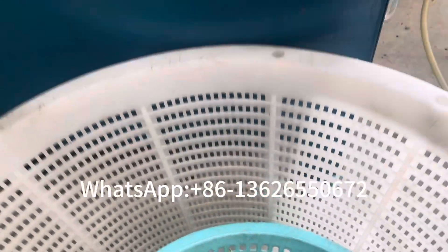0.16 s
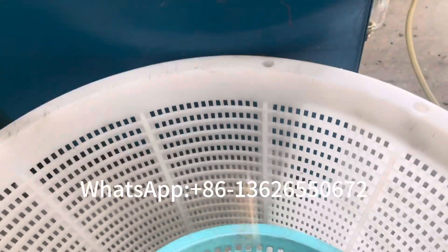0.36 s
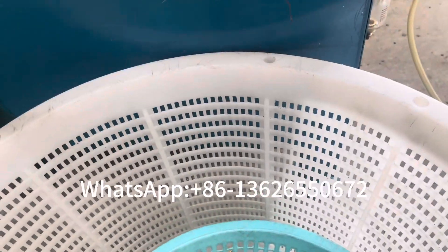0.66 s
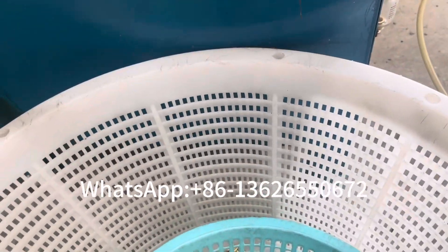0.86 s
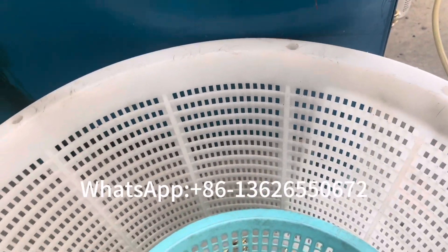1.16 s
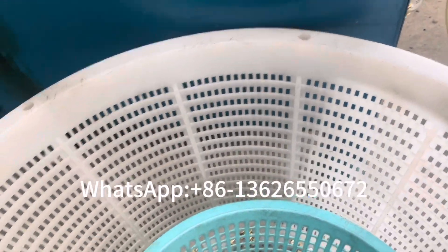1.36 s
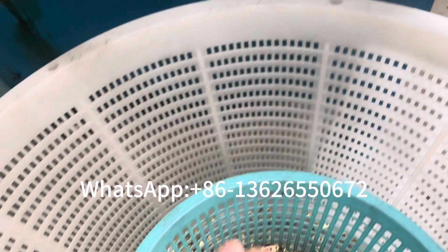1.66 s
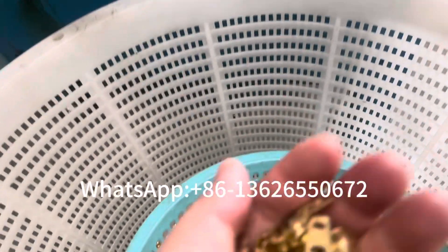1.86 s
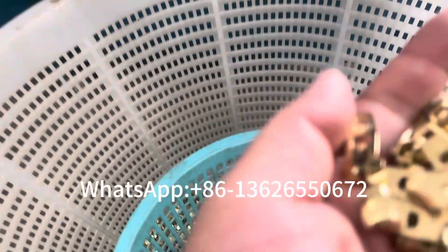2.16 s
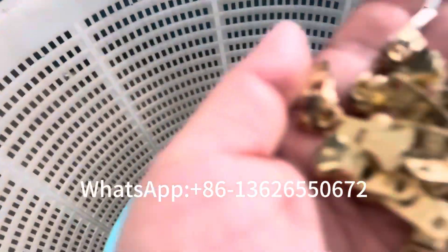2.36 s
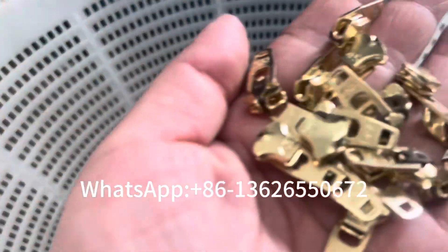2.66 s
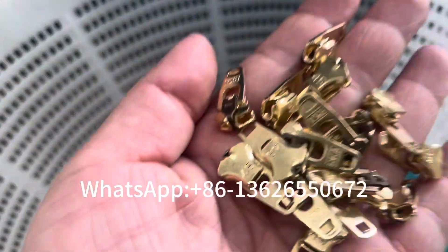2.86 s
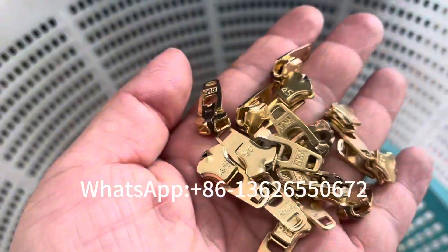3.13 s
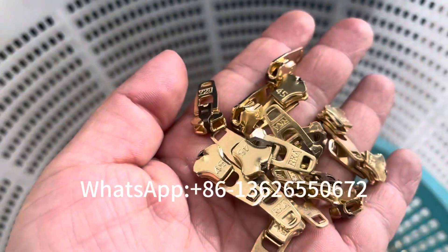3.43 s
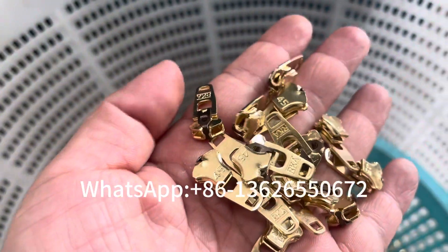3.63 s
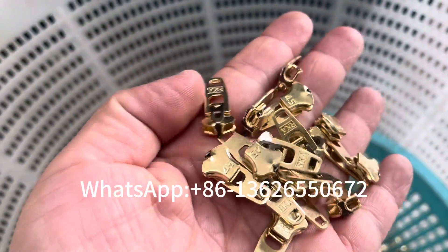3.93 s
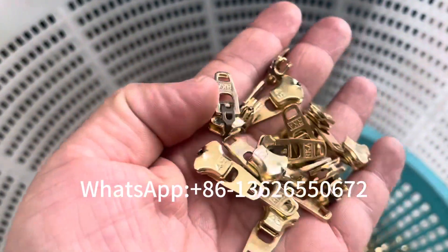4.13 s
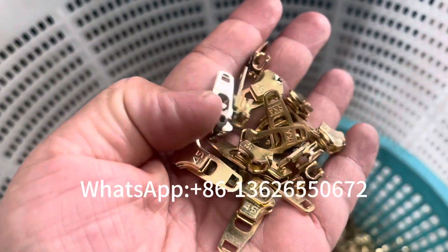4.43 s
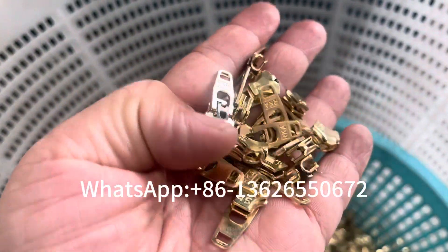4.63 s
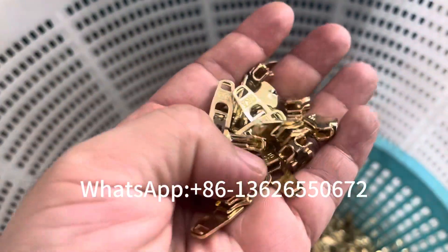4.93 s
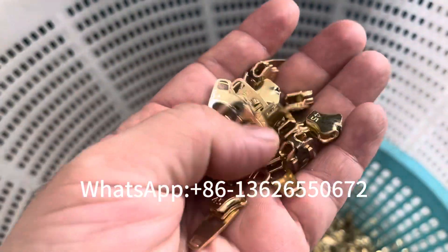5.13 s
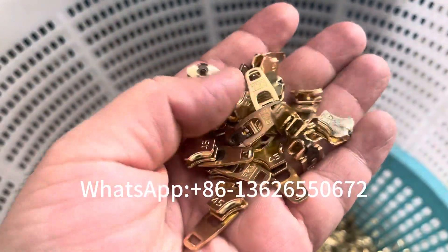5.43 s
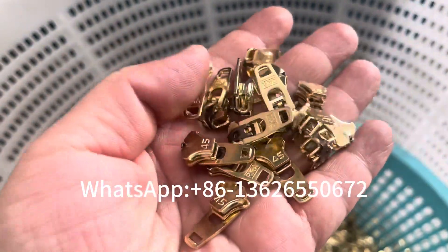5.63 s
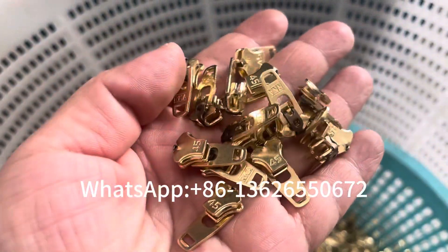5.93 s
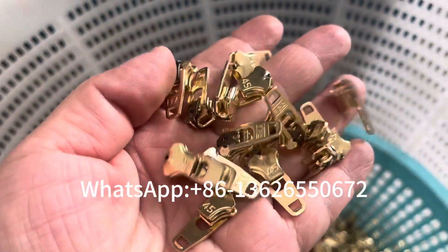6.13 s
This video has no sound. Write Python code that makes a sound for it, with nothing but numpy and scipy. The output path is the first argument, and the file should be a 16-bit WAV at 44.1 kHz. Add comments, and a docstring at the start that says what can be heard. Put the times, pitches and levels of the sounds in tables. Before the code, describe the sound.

A small assembly machine runs throughout, about 6.3 seconds, in a hard, reverberant workshop. From 0.13 s it strokes every 0.54 s: a deep knocking thump, then a lighter, slightly higher return thud 0.15 s later. Gritty rasps and short chatter follow each movement, with a crisp high tick about 0.22 s after each forward stroke. Small metal parts drop close by roughly once per cycle, with bright clinks, hard cracks and brief ringing, at 0.02, 0.58, 1.11 and 1.62 s, the last loudest with a brief dip in level after it, then on to 6.07 s. Latch snaps click late in some cycles. From about 3.7 s, sliders stirred in a hand add light ticks, strongest near 4.3 and 5.85 s. A vibrating bowl patters and rings continuously over low wavering hum and broadband workshop noise, heard in close stereo.

```python
"""Zip sliders beside a feeder and assembly machine

In a hard-walled workshop, a hand turns over brass sliders above a collecting basket, close to a stereo pair.
Swelling sines thump the frame out and back about twice a second; shaped grains rasp and noise bursts tick.
Finished parts drop with a clink of ringing modes and cracks; the vibrating bowl rings under random hops.
Behind lie wavering hum tones, banded noise for the workshop din, and a diffuse room tail."""
import sys
import numpy as np
from scipy import signal
from scipy.fft import rfft, irfft, next_fast_len
from scipy.io import wavfile

SR = 44100
rng = np.random.default_rng(int(sys.argv[2]) if len(sys.argv) > 2 else 0)


def file_out(sig):
    """Save sig as 16-bit WAV at sys.argv[1]."""
    # one column per channel
    cols = np.atleast_2d(sig).T
    # limit, then scale
    lim = np.clip(cols, -1, 1)
    pcm = np.round(lim * 32767).astype(np.int16)
    wavfile.write(sys.argv[1], SR, pcm)


N = 277389
TIME = np.arange(N) / SR
# the mechanism strokes forward once a cycle and returns after a fixed delay
FIRST_STROKE_S, CYCLE_S, RETURN_DELAY_S = 0.132, 0.5403, 0.152
STROKES_S = np.arange(FIRST_STROKE_S, N / SR, CYCLE_S)


def from_db(db):
    """Decibels to gain."""
    return 10 ** (np.asarray(db) / 20)


def rms_one(x):
    """Scale to unit power."""
    return x / np.sqrt(np.mean(x ** 2) + 1e-20)


def at_hz(points, hz):
    """Read a table on a log-frequency axis."""
    table_hz, values = np.array(points).T
    return np.interp(np.log(hz), np.log(table_hz), values)


def add(out, s, sound):
    """Mix a sound in at a time in seconds, trimmed to the scene."""
    i = int(round(s * SR))
    a, b = max(i, 0), min(i + sound.shape[-1], N)
    if b > a:
        out[..., a:b] += sound[..., a - i:b - i]


def drift(rate_hz):
    """Slow random wander with spread 1, drawn at every 40th sample."""
    r = np.exp(-80 * np.pi * rate_hz / SR)
    noise = rng.standard_normal(N // 40 + 2002)
    slow = signal.lfilter([1], [1, -2 * r, r * r], noise)[2000:]
    return np.interp(np.arange(N) / 40, np.arange(len(slow)), rms_one(slow))


def band(x, low_hz, high_hz):
    """Second-order band-pass."""
    edges = [low_hz, min(high_hz, .45 * SR)]
    return signal.sosfilt(signal.butter(2, edges, "band", fs=SR, output="sos"), x)


def ring(clicks, hz, t60):
    """A damped mode: a unit click starts a decaying sine of height 1."""
    r, w = from_db(-60 / (t60 * SR)), 2 * np.pi * hz / SR
    return signal.lfilter([0, np.sin(w)], [1, -2 * r * np.cos(w), r * r], clicks + 1e-18)


# how alike the left and right channels are: (f/Hz, likeness 0 to 1)
LIKENESS = [(50, 0.97), (250, 0.86), (500, 0.54), (700, 0.39), (2000, 0.42), (4000, 0.51), (6500, 0.52),
            (8000, 0.09), (12000, 1)]


def spread(pair, hz):
    """Two unrelated signals become left and right, as alike as the place makes them at this pitch."""
    alike = np.clip(at_hz(LIKENESS, hz), 0, .999)
    mid = np.sqrt((1 + alike) / 2) * pair[0]
    side = np.sqrt((1 - alike) / 2) * pair[1]
    return mid + side * np.array([[1], [-1]])


def grains(per_s, size_db):
    """Two trains of tiny collisions at random times, uneven in size and sign."""
    sizes = from_db(size_db * np.minimum(rng.exponential(1, (2, N)), 4))
    sizes *= rng.choice([-1, 1], (2, N))
    return rms_one(sizes * (rng.random((2, N)) < per_s / SR)) + 1e-18


def crack(low_hz, high_hz, t60):
    """A short stereo burst of contact noise, decaying from unit power."""
    t = TIME[:SR // 5]
    noise = rms_one(band(rng.standard_normal((2, len(t))), low_hz, high_hz))
    return spread(noise, np.sqrt(low_hz * high_hz)) * from_db(-60 * t / t60)


# frame modes, the low bending waves last: (f/Hz before stiffness, relative level/dB, delay t/s, swell t/s)
FRAME_THUMP_MODES = [(66.6, -15, 0.0014, 0.016), (102.5, 1, 0.00087, 0.0057), (163, -2.5, -.001, 0.006),
                     (207.4, -23, -.001, 0.0044)]
FRAME_KNOCK_MODES = [(297, -11.5, -.003, 0.0094), (379, 1.5, -.002, 0.0035), (630, -16.5, -.001, 0.0023)]
# the strokes grow very slowly lighter
STROKE_DRIFT_DB_PER_S = -0.06


def strokes(times, thump_db, knock_db, stiffness, scatter, vary_db):
    """Each stroke knocks the frame, and a deep thump follows a few milliseconds behind."""
    out, t = np.zeros(N), TIME[:SR // 8]
    for s in times:
        for modes, level in ((FRAME_THUMP_MODES, thump_db), (FRAME_KNOCK_MODES, knock_db)):
            level = level + STROKE_DRIFT_DB_PER_S * s + vary_db * rng.normal()
            for hz, mode_db, delay, swell in modes:
                pitch = hz * stiffness * np.exp(scatter * rng.normal())
                shape = t / swell * np.exp(1 - t / swell)
                add(out, s + delay, from_db(level + mode_db) * shape * np.sin(2 * np.pi * pitch * t))
    return out


# bursts from slides and jaws: (t/s from the forward stroke, swell t/s, centre f/Hz, width/octaves,
# relative level/dB)
RASP_BURSTS = [(-.012, 0.0082, 1980, 1.8, -28), (-.006, 0.0099, 330, 0.95, -29),
               (.03, .006, 1500, 1.2, -34.5), (.049, 0.0044, 2700, .4, -28), (.05, .012, 5540, 0.7, -32.5),
               (.055, 0.0065, 730, 0.26, -32), (0.063, 0.0056, 2020, .52, -26.5),
               (0.073, 0.0041, 1170, 1.06, -29), (.1505, 0.0033, 560, 0.36, -26),
               (0.166, 0.0015, 790, 0.21, -34), (.247, 0.0028, 1300, 1.1, -26),
               (0.253, 0.0028, 1900, 1.2, -23.5), (.262, 0.014, 384, 0.36, -32),
               (0.268, 0.0038, 940, .25, -26), (.269, 0.0046, 2200, 0.98, -30),
               (.279, 0.002, 1150, 0.51, -28.5)]


def rasps(level_db, vary_db, chatter_db, ring_db, per_s, size_db):
    """Slides and jaws chatter and rumble at the same points of every cycle, and set the bowl ringing."""
    out, size = 0, next_fast_len(N)
    hz = np.maximum(np.arange(size // 2 + 1) * SR / size, 1)
    body = 1
    for mode_hz, width_hz, _ in BOWL_MODES:
        body = body + from_db(ring_db) / (1 + 2j * (hz - mode_hz) / width_hz)
    for delay, swell_s, centre_hz, octaves, rasp_db in RASP_BURSTS:
        colour = body * np.exp(-.5 * (np.log2(hz / centre_hz) / octaves) ** 2)
        scrapes = grains(per_s, size_db) * from_db(chatter_db * drift(72))
        grit = rms_one(irfft(rfft(scrapes, size) * colour, size)[:, :N])
        force, age = np.zeros(N), TIME[:SR // 4] / swell_s
        for s, strong in zip(STROKES_S, rng.standard_normal(len(STROKES_S))):
            add(force, s + delay, from_db(rasp_db + vary_db * strong) * age * np.exp(1 - age))
        out = out + force * spread(grit, centre_hz)
    return from_db(level_db) * out


# modes of a small stop, tapped after each forward stroke: (f/Hz, relative level/dB, t60/s)
STOP_MODES = [(2776, 1, 0.056), (2700, -6, 0.041), (2270, -14, 0.066)]
TAP_DELAY_S = .2187


def taps(level_db, vary_db, crack_db, crack_t60):
    """A small stop is struck once in every cycle: a crisp tick and its short ring."""
    clicks, out = np.zeros((2, N)), np.zeros((2, N))
    for s in STROKES_S + TAP_DELAY_S:
        force = from_db(level_db + vary_db * rng.normal())
        add(clicks, s, force * spread((1, rng.normal()), STOP_MODES[0][0]))
        add(out, s, force * from_db(crack_db) * crack(2100, 4500, crack_t60))
    for hz, mode_db, t60 in STOP_MODES:
        out += from_db(mode_db) * ring(clicks, hz, t60)
    return out


def chatter(s, bounce_db, bounce_s):
    """A part touches down and bounces twice within milliseconds: (t/s, level/dB from the first touch)."""
    gaps = bounce_s * (.5 + rng.random(2))
    return [(s, 0), (s + gaps[0], bounce_db), (s + gaps.sum(), 2 * bounce_db)]


# about one part lands in each cycle, and some hop and land again:
# (t/s, then relative level/dB near each of the six frequencies below)
LANDINGS = [(0.024, -23.5, -35, -28, -22, -10.5, -22), (0.114, -42, -45, -45, -31, -34, -34),
            (0.5834, -26, -38, -43, -34, -20, -33), (0.613, -26, -36, -36, -30, -30, -33),
            (0.626, -23, -32, -34, -23, -20, -38), (1.1109, -16, -26, -37, -21.5, -15.5, -28),
            (1.172, -29, -48, -45, -33, -31, -41), (1.6157, -21, -21, -22, -9, -5.5, -19),
            (1.683, -18, -48, -44, -26, -32, -32), (1.761, -28, -30, -42, -23, -23, -35),
            (1.804, -36, -46, -48, -42, -22, -40), (2.2623, -15, -47, -45, -27, -17, -26),
            (2.291, -26, -45, -45, -34, -37, -40), (2.865, -20.5, -34, -29, -24, -14, -25),
            (3.257, -19.5, -35, -40, -27.5, -18, -30), (3.29, -21.5, -48, -46, -36, -39, -46),
            (3.3254, -22.5, -52, -52, -39, -35, -36), (3.914, -24.5, -42, -42, -29, -29, -39),
            (4.3572, -21.5, -35, -37, -24, -19, -30), (5.011, -23, -34, -39, -24.5, -22, -39),
            (5.4555, -19.5, -38, -32, -32, -19, -33), (5.651, -21.5, -45, -43, -36, -22, -35),
            (6.074, -15.5, -28.5, -25.5, -24, -12, -23)]
# the six frequencies of those levels: (f/Hz)
LANDING_BANDS_HZ = [3000, 5120, 5500, 7000, 8400, 11000]
# noise bands of a crack around those frequencies: (low f/Hz, high f/Hz)
CRACK_BANDS_HZ = [(2700, 3250), (3800, 5300), (5300, 6400), (6500, 7600), (7700, 9400), (9400, 14000)]
# the crack of a touch in each of those bands: (relative level/dB, t60/s)
CRACK_DECAYS = [(-6.5, .055), (-12, .04), (-14, .04), (-5, .1), (-4, .08), (-3, .071)]
# modes of the metal that the landing parts strike: (f/Hz, relative level/dB, t60/s)
METAL_MODES = [(2821, -5, .17), (2900, -8, .07), (3010, -6, .07), (3075, -8, .1), (3143, -6, .14),
               (3402, -15, .2), (3585, -11, .3), (3946, -11, .15), (4274, -7, .25), (4468, -11, .2),
               (4768, -7, .25), (5120, 0, .48), (5496, -2.5, .42), (5965, -9, .12), (6440, -12, .2),
               (6713, -11, .25), (6896, -2, .14), (6993, -5, .11), (7320, -7, .1), (7660, -6, .08),
               (8000, -3, .07), (8570, 0, .11), (9120, -5, .1), (9450, -8, .08), (9905, -9, .08),
               (10470, -9, .12), (11020, -7, .13), (11650, -10, .1)]


def clinks(ring_db, vary_db, apart, bounce_db, bounce_s):
    """A landing part sets the metal ringing, and each of its touches gives a hard crack."""
    out = np.zeros((2, N))
    for hz, mode_db, t60 in METAL_MODES:
        clicks = np.zeros((2, N))
        for s, *levels in LANDINGS:
            landing_db = at_hz(list(zip(LANDING_BANDS_HZ, levels)), hz)
            level = landing_db + ring_db + mode_db + vary_db * rng.normal()
            signs = rng.choice([-1, 1], 2) * np.array([1, apart])
            add(clicks, s, from_db(level) * spread(signs, hz))
        out += ring(clicks, hz, t60)
    for s, *levels in LANDINGS:
        for at, loss_db in chatter(s, bounce_db, bounce_s):
            for level, (low, high), (crack_db, t60) in zip(levels, CRACK_BANDS_HZ, CRACK_DECAYS):
                add(out, at, from_db(level + loss_db + crack_db) * crack(low, high, t60))
    return out


# sliders knock together in the hand, and two of these ticks (2.634 s, 5.873 s) are the latch snapping:
# (t/s, reference level/dB, treble level/dB from the reference)
METAL_TICKS = [(2.634, -17.5, -9), (3.8003, -12, -13.5), (4.3194, -9.5, -15), (5.423, -17, -2.5),
               (5.492, -19.5, 1.5), (5.5244, -22, -9), (5.8434, -8, -18), (5.8732, -3.5, -18.5)]
TICK_BODY_DB = -29   # from the reference
# late in some cycles a latch snaps: (t/s, reference level/dB)
LATCH_SNAPS = [(0.467, -14), (1.0032, -17), (2.086, -17.5), (3.168, -12.5), (3.7187, -15.5), (4.797, -13)]
SNAP_BODY_DB, SNAP_TREBLE_DB = -14.5, -10   # from the reference
# lighter touches come at random while the thumb stirs the sliders
STIR_FROM_S, TOUCHES_PER_S, TOUCH_BODY_DB, TOUCH_TREBLE_DB = 3.7, 2.9, -53, -36


def contacts():
    """Latch snaps, ticks of slider and latch, and light touches: (t/s, body level/dB, treble level/dB)."""
    latch = [(s, db + SNAP_BODY_DB, db + SNAP_TREBLE_DB) for s, db in LATCH_SNAPS]
    metal = [(s, db + TICK_BODY_DB, db + treble_db) for s, db, treble_db in METAL_TICKS]
    stirred = TIME[(rng.random(N) < TOUCHES_PER_S / SR) & (TIME > STIR_FROM_S)]
    touches = [(s, TOUCH_BODY_DB, TOUCH_TREBLE_DB) for s in stirred]
    return latch + metal + touches


def ticks(ring_db, ring_t60, low_db, high_db, glint_db, clack_db, t60):
    """Damped contacts: a snap with a dull clack, a bright glint and two quickly dying notes."""
    out, t = np.zeros((2, N)), TIME[:SR // 5]
    for s, low, treble in contacts():
        notes = sum(np.sin(2 * np.pi * hz * np.exp(.02 * rng.normal()) * t) for hz in (4100, 4750))
        body = from_db(low + low_db) * crack(3900, 5600, t60)
        edge = from_db(treble + high_db) * crack(6500, 14500, t60)
        glint = from_db(treble + glint_db) * crack(7900, 9600, t60)
        clack = from_db(low + clack_db) * crack(980, 3600, t60 / 2)
        add(out, s, from_db(low + ring_db - 60 * t / ring_t60) * notes)
        add(out, s, body + edge + glint + clack)
    return out


# resonances of the vibrating bowl: (f/Hz, width f/Hz, relative level/dB)
BOWL_MODES = [(1008, 40, -10), (1600, 39, -7), (2163, 27, -8), (2385, 43, -3), (2760, 89, -2.5),
              (3143, 43, -7), (4350, 40, -12), (6390, 230, -11.5)]


def bowl(ring_db, patter_db, per_s, size_db):
    """Parts hop on the vibrating track: a bright patter and the ring of the bowl."""
    hops = grains(per_s, size_db)
    out = from_db(patter_db) * spread(rms_one(band(hops, 1400, 12400)), 5000)
    for hz, width_hz, level_db in BOWL_MODES:
        tone = rms_one(signal.lfilter(*signal.iirpeak(hz, hz / width_hz, SR), hops))
        out += from_db(ring_db + level_db) * spread(tone, hz)
    return out


# hum of the drive and whines of the workshop: (f/Hz, level/dB, wander f/Hz)
HUM_TONES = [(48.7, -48, 1.58), (75.1, -44, 3.36), (100.6, -38.5, 0.72), (125, -42.5, 2.24),
             (299.7, -42.5, 0.27), (368, -44.5, 3.79), (448, -42, 2.5), (523, -58, 1.1), (947, -50.5, 1.22),
             (1012, -52.5, 0.96)]


def hum(rough):
    """Drive hum and workshop whines, each wavering in pitch and fluttering."""
    out = 0
    for hz, level_db, wander_hz in HUM_TONES:
        phase = 2 * np.pi * np.cumsum(hz + wander_hz * drift(3.94)) / SR
        tone = (1 + rough * drift(22.0)) * np.sin(phase) + rough * drift(5.7) * np.cos(phase)
        out = out + from_db(level_db) * rms_one(tone)
    return out


# colour of the workshop din: (f/Hz, relative level/dB per Hz)
DIN_COLOUR = [(25, -32), (38, -32), (50, -2), (100, 0), (170, -2.5), (230, -8), (400, -7.5), (620, -11.5),
              (1300, -12.5), (3000, -16.5), (6500, -16), (8500, -14.5), (10000, -24.5), (13000, -24),
              (15500, -32)]


def din(level_db, flicker_db, treble_flicker_db, surge_db, surge_delay_s):
    """Workshop noise in half-octave bands; the treble swells most with each machine cycle."""
    surge = np.cos(2 * np.pi * (TIME - FIRST_STROKE_S - surge_delay_s) / CYCLE_S)
    edges = 22 * 2 ** np.arange(0, 10, .5)
    out, white = 0, rng.standard_normal((2, 2, N))
    for k, (low, high) in enumerate(zip(edges, edges[1:])):
        hz = np.sqrt(low * high)
        flicker = np.interp(hz, [1000, 4000], [flicker_db, treble_flicker_db])
        level = at_hz(DIN_COLOUR, hz) + flicker * drift(15.0) + surge_db * surge * min(hz / 3000, 1)
        # neighbouring bands take unrelated noise
        out = out + from_db(level) * spread(band(white[k % 2], low, high), hz)
    return from_db(level_db) * rms_one(out)


ROOM_T60_S = 0.42


def workshop(x):
    """A diffuse noise tail from the hard walls, nearly the same in both channels in the bass."""
    t = TIME[:SR // 2]
    tail = rng.standard_normal((2, len(t))) * from_db(-60 * t / ROOM_T60_S) * (t > .008)
    tail = spread(band(tail, 73, 750), 200) + spread(band(tail, 680, 14000), 2000)
    return signal.fftconvolve(x, tail / np.sqrt(np.sum(tail ** 2) / 2), axes=1)[:, :N]


# the level dips briefly around the loudest clink
DIP_START_S, DIP_FALL_S, DIP_RECOVER_S, DIP_DB = 1.613, 0.042, 0.19, -7


def dip():
    """Gain that falls quickly and creeps back exponentially."""
    t = TIME - DIP_START_S
    fall = np.clip(t / DIP_FALL_S, 0, 1)
    recovery = np.exp(-np.maximum(t - DIP_FALL_S, 0) / DIP_RECOVER_S)
    return from_db(DIP_DB * fall * recovery)


def scene():
    """Machine, bowl and workshop, with the falling parts close to the microphones."""
    frame = strokes(STROKES_S, thump_db=-15.3, knock_db=-21.5, stiffness=.95, scatter=.03, vary_db=.4)
    frame += strokes(STROKES_S + RETURN_DELAY_S, thump_db=-18.5, knock_db=-27.5,
                     stiffness=1.11, scatter=.035, vary_db=1)
    rattle = rasps(level_db=1.3, vary_db=.8, chatter_db=1.5, ring_db=2, per_s=1400, size_db=2)
    rattle += taps(level_db=-25, vary_db=1, crack_db=0, crack_t60=.06)
    rattle += bowl(ring_db=-44.5, patter_db=-44.5, per_s=700, size_db=2.5)
    parts = clinks(ring_db=-.8, vary_db=2, apart=.92, bounce_db=-5.5, bounce_s=.004)
    parts += ticks(ring_db=1.5, ring_t60=0.07, low_db=2.0, high_db=-4.0, glint_db=-2, clack_db=-1, t60=0.082)
    steady = hum(rough=0.59)
    steady = steady + din(level_db=-26.5, flicker_db=2.5, treble_flicker_db=2.27,
                          surge_db=0.8, surge_delay_s=0.14)
    # the frame and the falling parts are close by and send less to the room
    echo = from_db(-6.0) * workshop(rattle + (frame + parts) / 2)
    return (frame + rattle + parts + echo + steady) * dip()


# the treble sits out of phase between the channels in two bands: (f/Hz, phase/rad by which left leads)
CHANNEL_PHASE = [(0, 0), (3100, 0.5), (6370, -0.3), (7670, -3.0), (8870, -3.1), (9820, -6.0), (13000, -6.4),
                 (13600, -6.6), (13900, -9.4), (15300, -9.4)]
CEILING, CUTOFF_HZ = .7, 15650   # ceiling in full scale


def record(dry):
    """Bass cut, rounded peaks, nearly mono high treble, left a little louder below it, and a steep top cut."""
    dry = signal.sosfilt(signal.butter(4, 40, "high", fs=SR, output="sos"), dry)
    dry = dry / (1 + (dry / CEILING) ** 6) ** (1 / 6)
    size = next_fast_len(N + 2048)
    hz = np.arange(size // 2 + 1) * SR / size
    left, right = rfft(dry, size)
    width = np.interp(hz, [6600, 7800], [1, .1])
    mid, side = (left + right) / 2, width * (left - right) / 2
    lean_db = 0.58 * width
    lead = np.interp(hz, *np.transpose(CHANNEL_PHASE))
    left = (mid + side) * from_db(lean_db)
    right = (mid - side) * from_db(-lean_db) * np.exp(-1j * lead)
    top_cut = np.sqrt(1 + (hz / CUTOFF_HZ) ** 800)
    return irfft(np.array([left, right]) / top_cut, size)[:, :N]


dry = scene()
out = record(dry)
file_out(out)
```